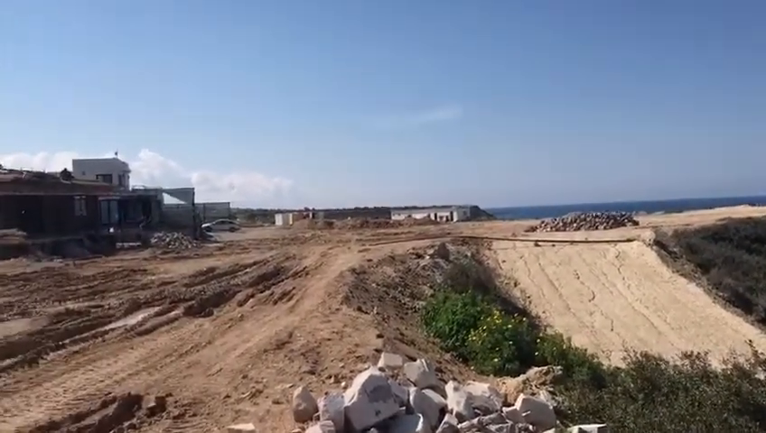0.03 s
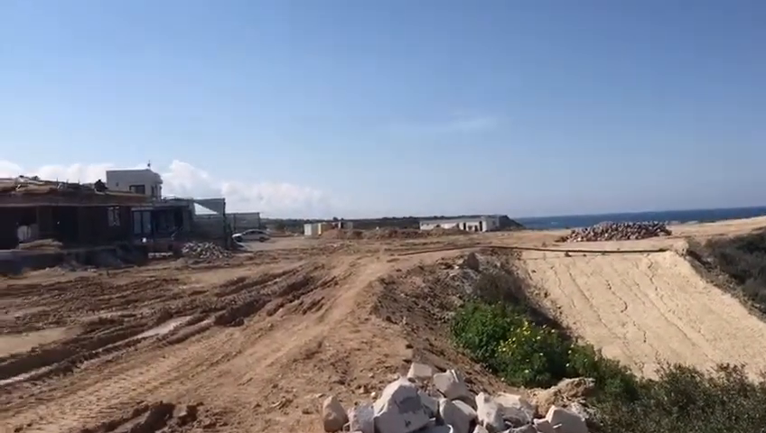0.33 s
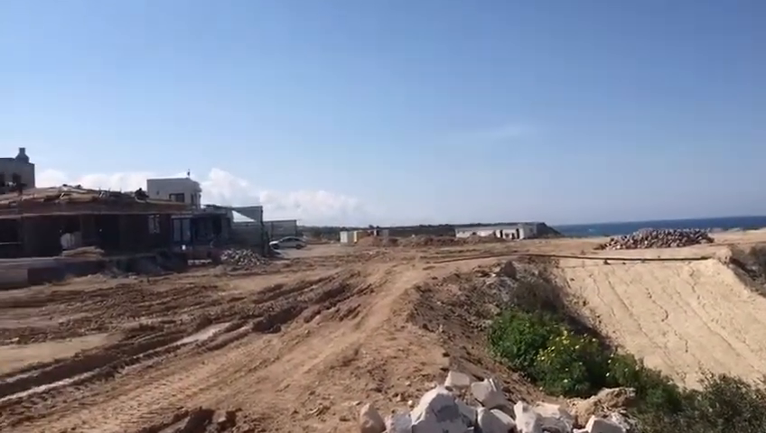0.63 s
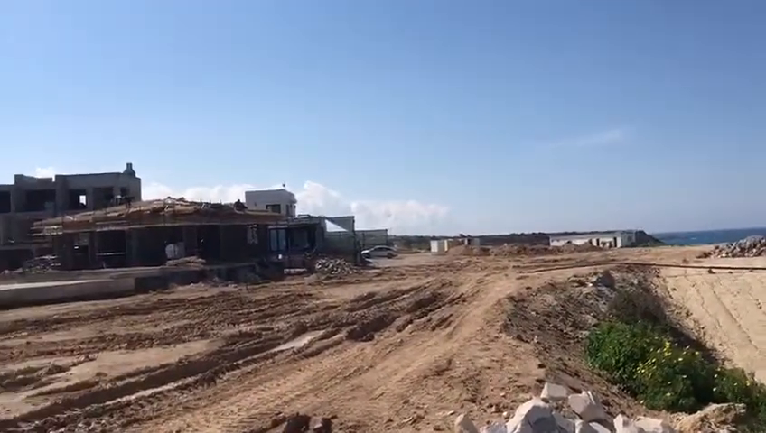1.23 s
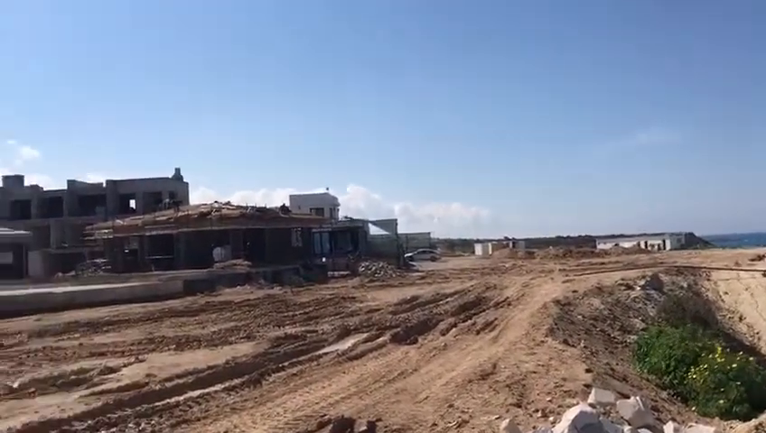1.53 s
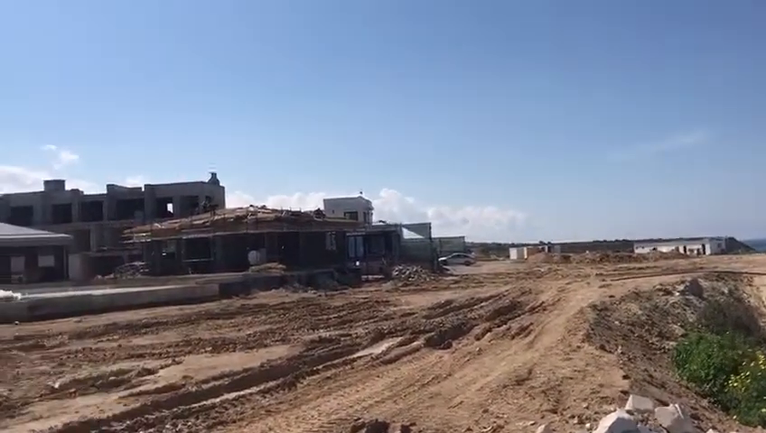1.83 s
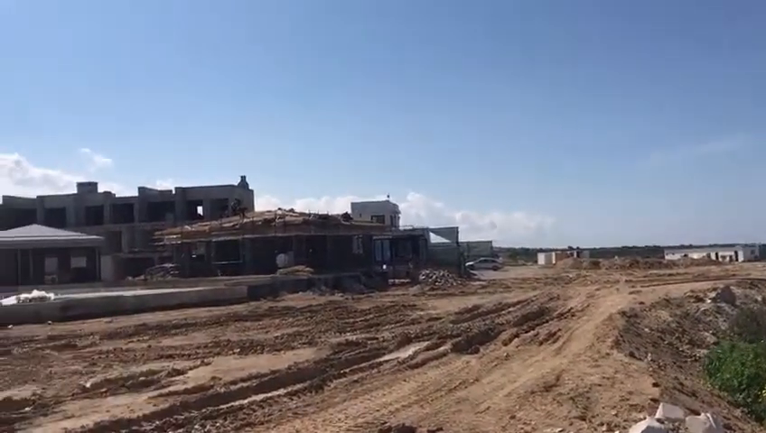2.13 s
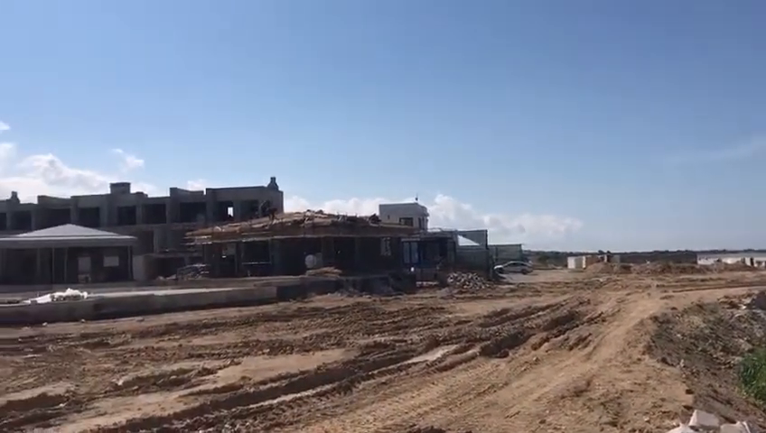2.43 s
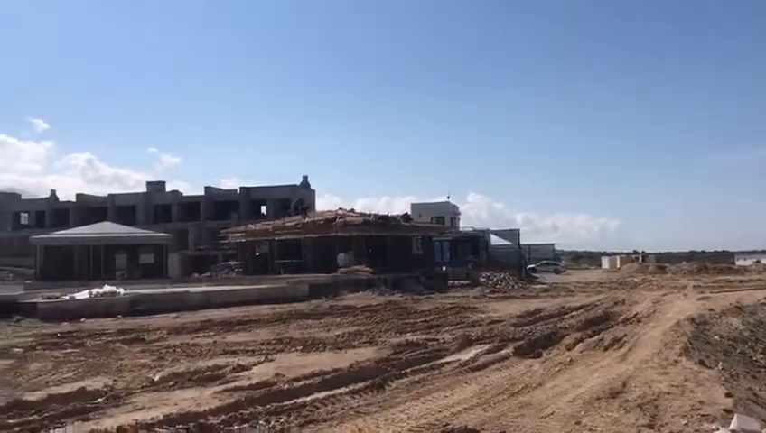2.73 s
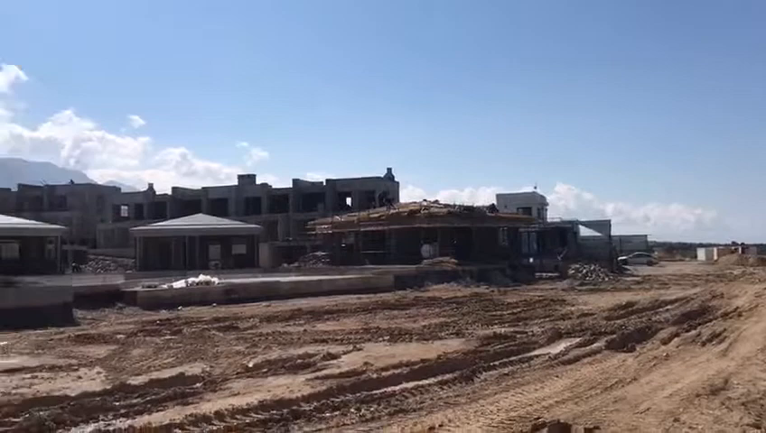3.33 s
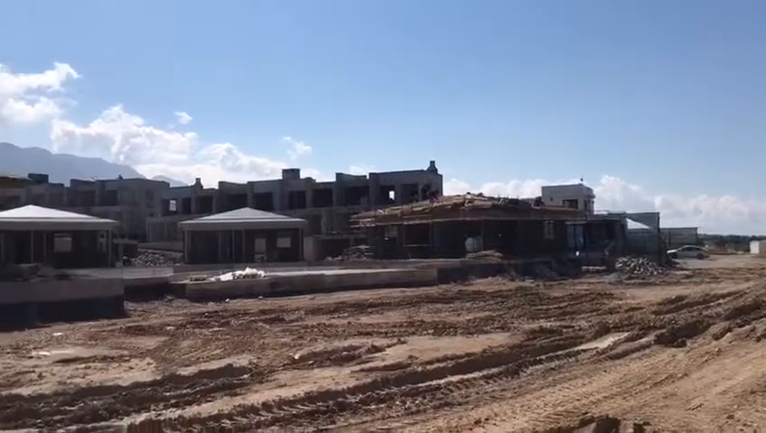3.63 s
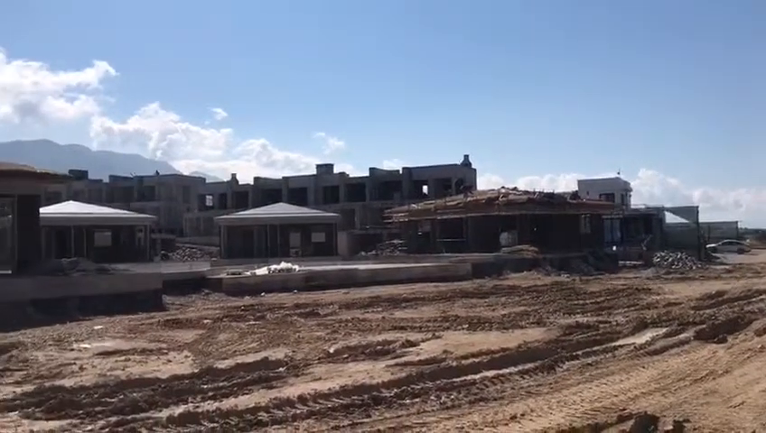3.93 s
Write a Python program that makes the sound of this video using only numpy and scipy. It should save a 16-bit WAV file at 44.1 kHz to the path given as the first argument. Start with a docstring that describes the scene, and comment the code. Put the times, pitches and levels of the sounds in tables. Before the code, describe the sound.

Gusty wind rumbles and thumps on the microphone, with faint surf and distant hammering.

```python
"""On an open building site by the sea, gusty wind buffets a bare microphone.
Turbulent pressure at its port makes a rumble that swells and brightens with the flow,
and each passing vortex adds a thump. Behind lie a steady wash of surf and site noise,
a thin hiss, a late rustle and a few faint scuffs of grit. Far hammer blows excite
the modes of a piece of steel, and the buildings reflect its ring."""
import sys
import numpy as np
from scipy import signal
from scipy.io import wavfile
from scipy.ndimage import uniform_filter1d, minimum_filter1d

SR = 44100
rng = np.random.default_rng(int(sys.argv[2]) if len(sys.argv) > 2 else 0)


def pcm_store(signal):
    """Save signal as 16-bit PCM."""
    levels = np.round(np.clip(np.atleast_2d(signal), -1, 1) * 32767)
    wavfile.write(sys.argv[1], SR, levels.astype(np.int16).T)


N = 176400
TIME = np.arange(N) / SR


def from_db(db):
    """Amplitude ratio: tenfold for every 20 dB."""
    return 10 ** (np.asarray(db) / 20)


def rms_one(x):
    """Normalisation to unit mean power."""
    return x / np.sqrt(np.mean(x ** 2) + 1e-20)


def in_time(rows):
    """Linear interpolation between rows of time in seconds and value."""
    return np.interp(TIME, *np.transpose(rows))


def filtered(x, hz, kind, order=2):
    """Butterworth filtering: a maximally flat passband."""
    sos = signal.butter(order, np.clip(hz, 10, .45 * SR), kind, fs=SR, output="sos")
    return signal.sosfilt(sos, x)


def drift(corner_hz):
    """Low-passed Gaussian noise: a smooth random fluctuation of unit spread."""
    pole = np.exp(-80 * np.pi * corner_hz / SR)  # one step per 40 samples
    slow = signal.lfilter([1], [1, -2 * pole, pole * pole], rng.standard_normal(N // 40 + 2002))[2000:]
    return np.interp(np.arange(N) / 40, np.arange(len(slow)), rms_one(slow))


def noise_bands(spectrum, count):
    """Incoherent bands add in power: returns centres in Hz and bands that sum to rms 1."""
    hz, db = np.transpose(spectrum)
    edges = np.geomspace(hz[0], hz[-1], count + 1)
    centres = np.sqrt(edges[1:] * edges[:-1])
    gains = from_db(np.interp(np.log(centres), np.log(hz), db)) * np.sqrt(np.diff(edges))
    bands = []
    for k, gain in enumerate(gains):
        band = filtered(rng.standard_normal(N + SR // 4), edges[k:k + 2], "band", order=3)[-N:]
        bands.append(gain * rms_one(band))
    return centres, np.array(bands) / np.linalg.norm(gains)


# Spectrum of surf and site. Each row: frequency in Hz, relative density in dB.
SURF_SPECTRUM = [(100, 12), (300, -7), (450, -3.5), (650, -1), (850, -10), (1150, -5), (1600, -11),
                 (2300, -15.5), (3200, -22), (4800, -27.5), (6500, -34.5), (7800, -41.5), (9500, -42.5),
                 (11500, -54.5)]
# Their loudness. Each row: time in seconds, level in dB.
SURF_LEVEL = [(0, -44), (.9, -43.5), (1.45, -43.5), (2.0, -46), (2.5, -44.5), (3.1, -47.5), (3.5, -48),
              (4, -47)]

def surf_and_site():
    """Many distant sources sum incoherently to a broad, nearly steady wash."""
    _, bands = noise_bands(SURF_SPECTRUM, count=22)
    return bands.sum(0) * from_db(in_time(SURF_LEVEL) + .5 * drift(corner_hz=24))


# Spectrum of the hiss. Each row: frequency in Hz, relative density in dB.
HISS_SPECTRUM = [(2000, -16), (3300, -11.5), (5000, 6.5), (7500, -0.5), (9500, -1.5), (11500, 0.5)]
# Its loudness. Each row: time in seconds, level in dB.
HISS_LEVEL = [(0, -82.5), (2.7, -84), (2.77, -70.5), (3.3, -71), (3.66, -67.5), (3.73, -73.5), (4, -78)]

def hiss():
    """Amplitude-modulated treble noise: a thin hiss that rises late."""
    _, bands = noise_bands(HISS_SPECTRUM, count=6)
    return bands.sum(0) * from_db(in_time(HISS_LEVEL))


# Loudness of the rustle. Each row: time in seconds, level in dB.
RUSTLE_LEVEL = [(0, -82.5), (3.25, -76), (3.55, -62), (4, -65.5)]

def rustle(band_hz=(2770, 3870)):
    """Band-limited noise swells into a rustle late in the gust."""
    return rms_one(filtered(rng.standard_normal(N), band_hz, "band")) * from_db(in_time(RUSTLE_LEVEL))


# Rubs of grit. Each row: peak time in seconds, level in dB, Gaussian width in seconds, centre in Hz.
GRIT_SCUFFS = [(0.429, -58, 0.016, 5100), (1.077, -71, 0.017, 9400), (1.492, -59.5, .0014, 7040),
               (1.613, -64, 0.011, 7000), (2.207, -60, 0.01, 5100), (2.621, -65.5, 0.014, 5500),
               (3.67, -61, 0.013, 4300)]

def scuffs(grain_db=3, grain_hz=270):
    """Friction on grit gives brief, uneven swells of noise an octave wide."""
    out = np.zeros(N)
    for peak_s, db, width_s, hz in GRIT_SCUFFS:
        grains = rng.standard_normal(N) * from_db(grain_db * drift(grain_hz))
        grit = rms_one(filtered(grains, hz * 2 ** np.array([-.5, .5]), "band"))
        out += grit * from_db(db) * np.exp(-.5 * ((TIME - peak_s) / width_s) ** 2)
    return out


def burst(start_s, hz, octaves, t60_s):
    """An impact transient: a band of noise with sudden onset and exponential decay."""
    decay = (TIME >= start_s) * np.exp(-np.log(1000) * np.abs(TIME - start_s) / t60_s)
    edges = hz * 2 ** (octaves * np.array([-.5, .5]))
    return filtered(rng.standard_normal(N) * decay, edges, "band") * np.sqrt(SR / 2 / np.ptp(edges))


# Modes of the steel. Each row: frequency in Hz, relative level in dB, 60 dB decay time in seconds.
STEEL_MODES = [(3360, -2.5, 0.027), (3507, 3, .065), (3570, -7.5, 0.072), (4060, -13.5, 0.089),
               (4970, -21, 0.042), (6400, -17, .04), (8600, -19, .09), (9500, -22.5, 0.048)]

def steel(force):
    """Modal superposition: the force drives damped resonators of alternating sign."""
    out = np.zeros(N)
    for k, (hz, db, t60_s) in enumerate(STEEL_MODES):
        radius, angle = from_db(-60 / (t60_s * SR)), 2 * np.pi * hz / SR
        feedback = [1, -2 * radius * np.cos(angle), radius ** 2]
        mode = signal.lfilter([0, np.sin(angle)], feedback, force + 1e-18)
        out += (-1) ** k * mode * from_db(db + rng.normal(0, 1))
    return out


# Echoes from the buildings. Each row: delay in seconds, gain in dB.
BUILDING_ECHOES = [(.07, -13), (.092, -14), (.16, -12), (.222, -20)]

def reflections(sound, air_cut_hz=5000, t60_s=1.3, tail_db=-.5):
    """Reflection gives distinct echoes and scattering a diffuse tail; air absorption dulls both."""
    dull = filtered(sound, air_cut_hz, "low")
    scatter = rng.standard_normal(N) * np.exp(-np.log(1000) * TIME / t60_s)
    tail = signal.fftconvolve(dull, scatter / np.linalg.norm(scatter))[:N]
    echoes = sum(from_db(db) * np.pad(dull, (int(delay * SR), 0))[:N] for delay, db in BUILDING_ECHOES)
    return from_db(tail_db) * tail + echoes


# Blows and bounces. Each row: start in seconds, ring gain in dB, knock gain in dB, knock centre in Hz,
# tick gain in dB, gain into the reflections in dB, hardness as a cut-off in Hz.
HAMMER_BLOWS = [(0.2538, -48.5, -28.5, 1161, -39, -1.5, 11840), (.262, -37, -44, 1500, -56, -3.5, 5180),
                (0.839, -38, -39, 2400, -63, -12, 9000), (2.44, -55, -65, 2900, -78, 4.5, 3980)]

def hammer():
    """Impact excitation: each blow knocks, ticks and rings the steel; harder contact rings brighter."""
    direct, sent = np.zeros(N), np.zeros(N)
    for start_s, ring_db, knock_db, knock_hz, tick_db, echo_db, hardness_hz in HAMMER_BLOWS:
        knock = from_db(knock_db) * burst(start_s, knock_hz, octaves=1.36, t60_s=.018)
        tick = from_db(tick_db) * burst(start_s, hz=6300, octaves=.32, t60_s=.0088)
        force = filtered(signal.unit_impulse(N, int(start_s * SR)), hardness_hz, "low")
        ring = from_db(ring_db) * steel(force)
        direct += knock + tick + ring
        sent += from_db(echo_db) * ring
    return direct + reflections(sent)


def vortex(core_s):
    """A vortex has a low-pressure core: it passes as a sharp dip between two shoulders."""
    offset = np.arange(-SR // 25, SR // 25 + 1) / SR / core_s
    return (3 * offset ** 2 - 1) / (1 + offset ** 2) ** 3


def port(pressure, hollow_hz=(620, 780), hollow_db=-6.5, cut_hz=1450):
    """The microphone port is a resonator and low-pass: it colours and rounds off the pulses."""
    hollow = filtered(pressure, hollow_hz, "band", order=1)
    return filtered(pressure + from_db(hollow_db) * hollow, cut_hz, "low", order=3)


# Strength of the small eddies. Each row: time in seconds, gain in dB.
SWARM_GAIN = [(0, -39.5), (.75, -45), (.89, -26.5), (1.15, -63), (1.42, -38), (1.58, -33.5), (2.2, -44.5),
              (2.47, -33.5), (2.62, -28.5), (2.75, -18.5), (2.95, -20.5), (3.1, -14), (3.28, -20),
              (3.4, -44), (3.46, -30.5), (3.66, -29.5), (3.76, -18.5), (3.83, -29.5), (4, -32)]

def eddy_swarm(per_second=170, core_range_s=(.00074, .0026), sizes=5):
    """Small eddies of several sizes arrive as a Poisson process and make the gusts flap."""
    out = np.zeros(N)
    for core_s in np.geomspace(*core_range_s, sizes):
        arrivals = rng.random(N) < per_second / sizes / SR
        pulses = signal.fftconvolve(arrivals.astype(float), vortex(core_s), "same")
        out += pulses * np.sqrt(core_s / np.mean(core_range_s))
    return out * from_db(in_time(SWARM_GAIN))


# The strongest eddies. Each row: arrival in seconds, relative level in dB, core half-width in seconds.
STRONG_EDDIES = [(.005, -9.5, 0.0036), (0.4444, -2, 0.0026), (0.454, -11, .006), (.469, -7.5, 0.0033),
                 (.897, -9.5, .0028), (.944, -14, 0.0036), (1.042, -8, 0.0041), (1.535, -11, 0.0028),
                 (1.584, -10.5, 0.0021), (1.603, -11.5, 0.003), (1.6782, -3.5, 0.0026),
                 (1.801, -13.5, 0.0018), (1.91, -18, 0.0013), (1.919, -10, 0.0019), (1.977, -8.5, .0017),
                 (2.012, -7, 0.0035), (2.066, -14.5, 0.0028), (2.1465, -8, 0.0031), (2.586, -9, 0.0023),
                 (2.6672, -6.5, 0.0022), (2.6972, -10, 0.0037), (2.717, -6.5, 0.0018),
                 (2.735, -10, 0.00092), (2.746, 1, .0025), (2.787, -5.5, 0.0019), (2.804, -4.5, 0.0015),
                 (2.869, -13.5, 0.001), (2.882, -6, 0.002), (2.9614, -8.5, 0.0017), (2.986, -10, .0013),
                 (3.017, -10.5, 0.0016), (3.0323, -5, 0.0015), (3.0488, -3, 0.0015), (3.057, -25, 0.0011),
                 (3.0885, -3, 0.00092), (3.102, -11, 0.00093), (3.1132, -3, 0.0015), (3.138, -18, 0.00086),
                 (3.1686, -4.5, .0017), (3.195, -3.5, 0.0027), (3.219, -12.5, .001), (3.231, -3.5, .0018),
                 (3.312, -11.5, 0.0017), (3.4555, -23, 0.0011), (3.537, -18.5, 0.0016), (3.619, -14, 0.002),
                 (3.708, -12, 0.0015), (3.749, -10.5, 0.0014), (3.755, -7.5, 0.0033),
                 (3.779, -11.5, 0.0013), (3.888, -14, 0.0023), (3.964, -20, 0.0013)]

def eddy_thumps(gain_db=-.52, wake_db=-14, wake_s=.0053):
    """Each vortex thumps once inside a short turbulent wake; a smaller core sounds brighter."""
    out = np.zeros(N)
    for arrival_s, db, core_s in STRONG_EDDIES:
        dip = vortex(core_s)
        t = (np.arange(len(dip)) - len(dip) // 2) / SR
        turbulence = rms_one(signal.fftconvolve(rng.standard_normal(len(dip)), dip, "same"))
        wake = from_db(wake_db) * turbulence * np.exp(-.5 * (t / wake_s) ** 2)
        out += from_db(db + gain_db) * np.interp(TIME - arrival_s, t, dip + wake, 0, 0)
    return out


# Wind at the port. Each row: time in seconds, strength in dB.
WIND_FLOW = [(0, -25.5), (.04, -36), (.17, -22), (.23, -42), (.31, -46), (.36, -26.5), (.42, -23.5),
             (.46, -18), (.5, -34.5), (.59, -23), (.69, -38.5), (.82, -37), (.9, -17.5), (.98, -33),
             (1.05, -24), (1.16, -33.5), (1.24, -25.5), (1.4, -40.5), (1.47, -24), (1.5, -37.5),
             (1.59, -20), (1.63, -30), (1.7, -17.5), (1.84, -25.5), (1.98, -17.5), (2.1, -26), (2.33, -28),
             (2.42, -35.5), (2.58, -18.5), (2.75, -19.5), (2.84, -18), (2.95, -20), (3.08, -12.5),
             (3.22, -25.5), (3.27, -26.5), (3.35, -28.5), (3.41, -65), (3.46, -24.5), (3.61, -28.5),
             (3.68, -38), (3.71, -17.5), (3.77, -22), (3.82, -34), (3.96, -31.5), (4, -27.5)]
# Rumble at the reference flow. Each row: frequency in Hz, relative density in dB.
RUMBLE_SPECTRUM = [(30, -27), (40, -11), (55, 0), (90, -2), (160, -0.5), (230, -10.5), (330, -23),
                   (500, -41), (800, -50.5), (1400, -69.5)]

def wind_rumble(gain_db=-22.5, reference_flow_db=-22.5, pivot_hz=166, swing_per_octave=.8):
    """Turbulent pressure flutters at the port; faster flow is louder and reaches higher frequencies."""
    centres, bands = noise_bands(RUMBLE_SPECTRUM, count=14)
    bands = bands / np.sqrt(uniform_filter1d(bands.sum(0) ** 2, size=1400))  # even out chance swells
    flow_db = in_time(WIND_FLOW) - reference_flow_db
    swings = np.maximum(1 + swing_per_octave * np.log2(centres / pivot_hz), .55)  # bass swings least
    flutter_db = 6.5 * np.tanh(drift(corner_hz=28.5))
    gusts = sum(band * from_db(swing * flow_db) for band, swing in zip(bands, swings))
    return from_db(gain_db + flutter_db) * gusts


def scene():
    """Superposition in one channel: wind on the port in front of the far site."""
    wind = wind_rumble() + port(eddy_thumps() + eddy_swarm())
    return (wind + surf_and_site() + hiss() + rustle() + scuffs() + hammer())[None]


def record(dry, bass_cut_hz=32.7, ceiling=.98, top_cut_hz=11900):
    """Band and peak limiting: the microphone sheds deep bass and top, and holds the hardest thumps."""
    sound = filtered(dry, bass_cut_hz, "high", order=4)
    allowed_gain = minimum_filter1d(ceiling / np.maximum(np.abs(sound), ceiling), size=900)
    smooth_gain = uniform_filter1d(uniform_filter1d(allowed_gain, size=440), size=440)
    return signal.sosfilt(signal.ellip(10, .1, 80, top_cut_hz, fs=SR, output="sos"), sound * smooth_gain)


dry = scene()
out = record(dry)
pcm_store(out)
```